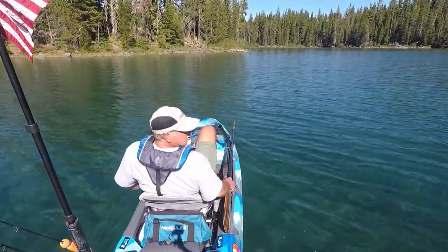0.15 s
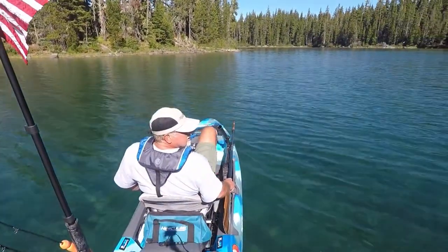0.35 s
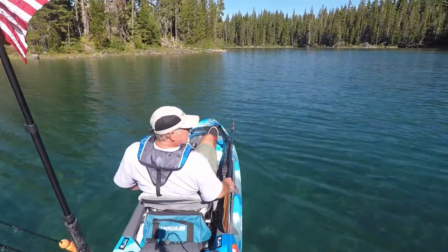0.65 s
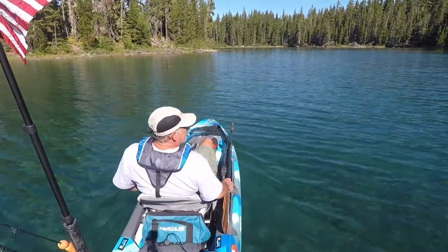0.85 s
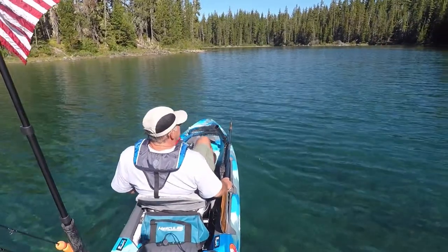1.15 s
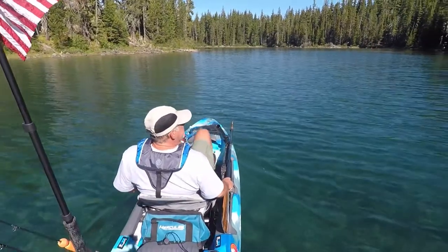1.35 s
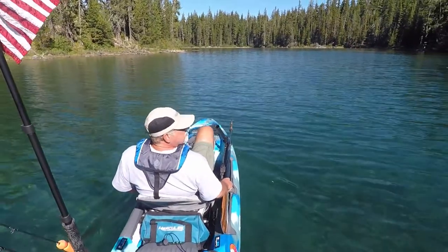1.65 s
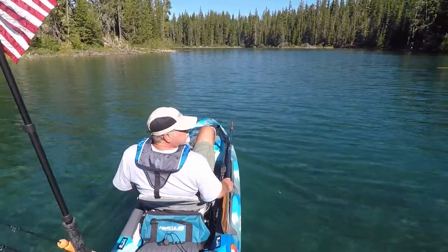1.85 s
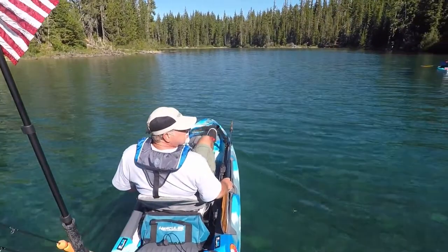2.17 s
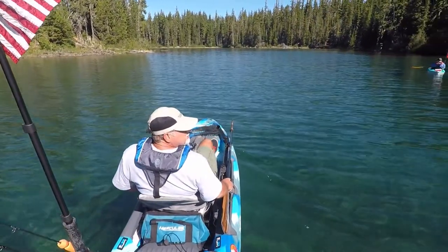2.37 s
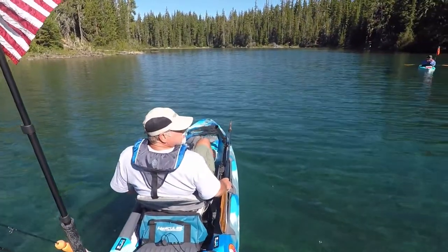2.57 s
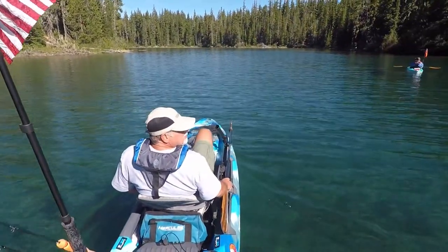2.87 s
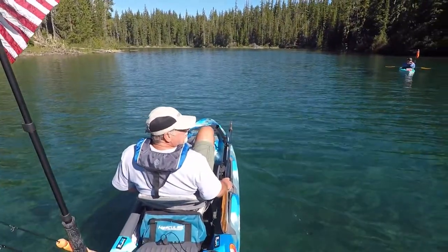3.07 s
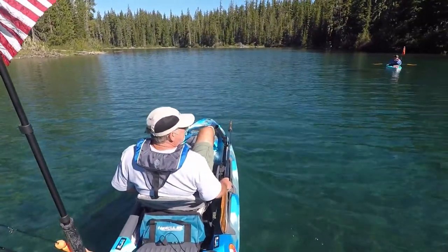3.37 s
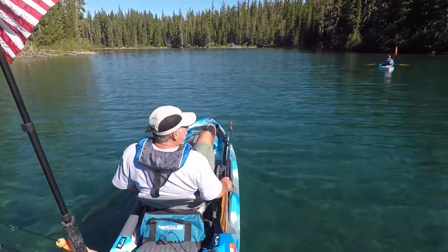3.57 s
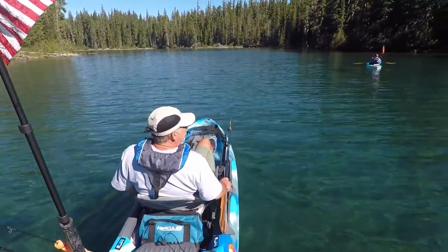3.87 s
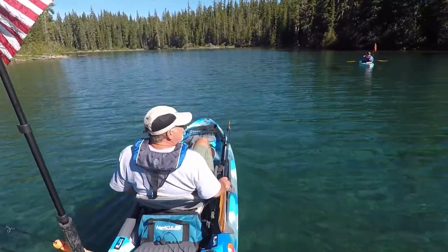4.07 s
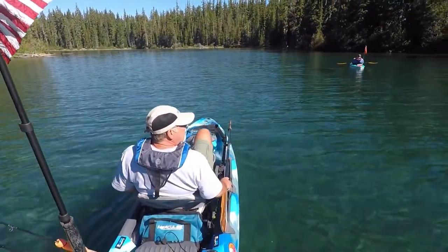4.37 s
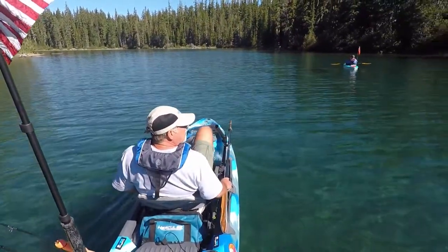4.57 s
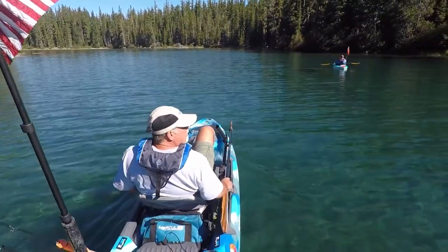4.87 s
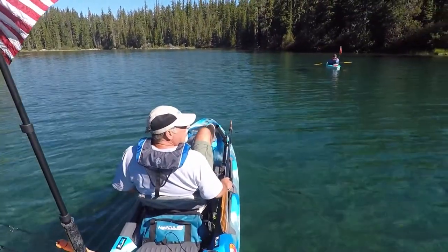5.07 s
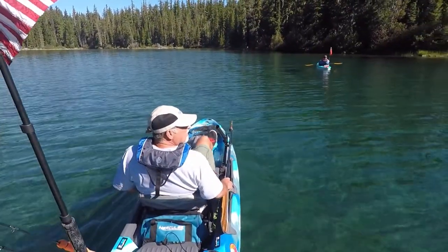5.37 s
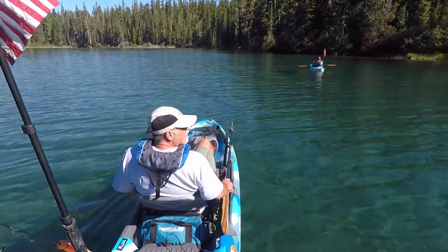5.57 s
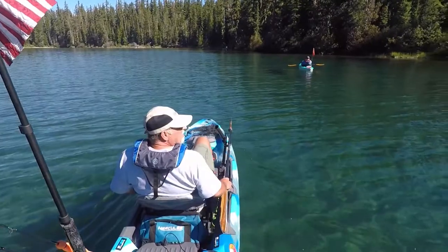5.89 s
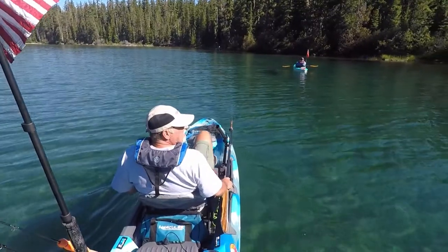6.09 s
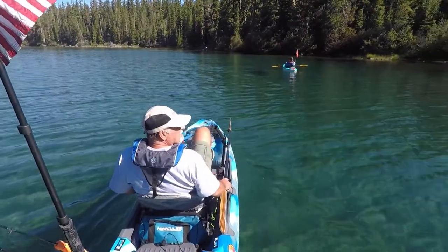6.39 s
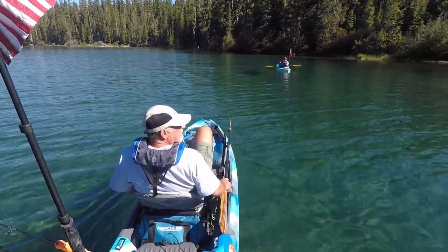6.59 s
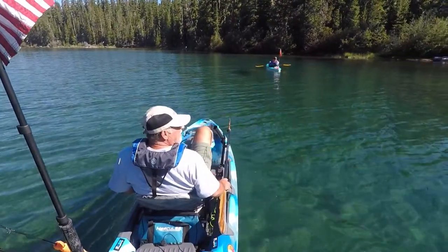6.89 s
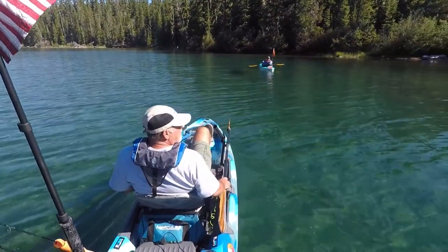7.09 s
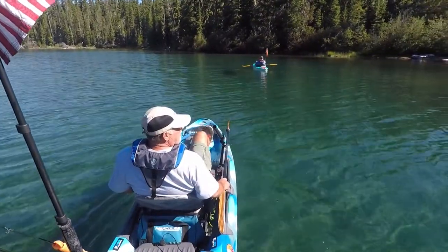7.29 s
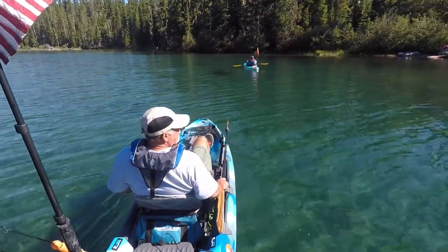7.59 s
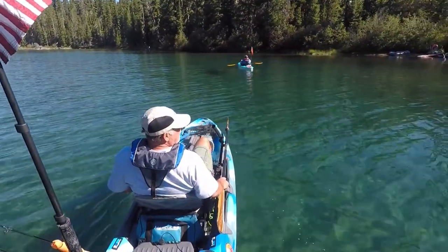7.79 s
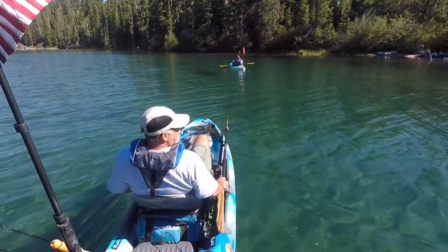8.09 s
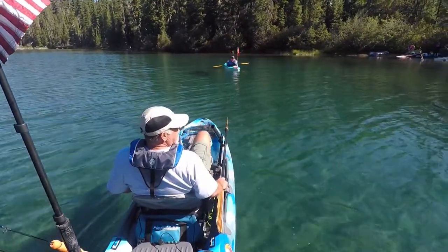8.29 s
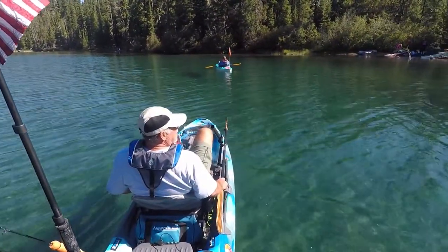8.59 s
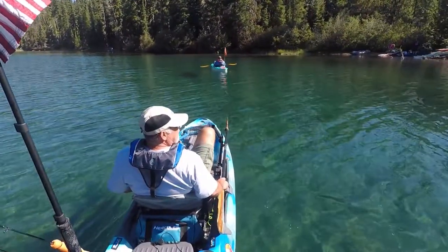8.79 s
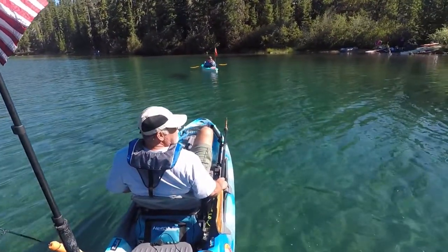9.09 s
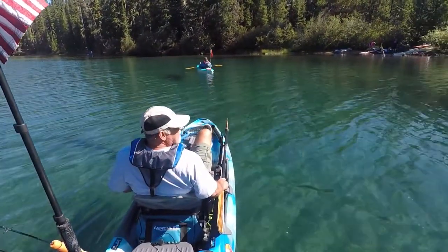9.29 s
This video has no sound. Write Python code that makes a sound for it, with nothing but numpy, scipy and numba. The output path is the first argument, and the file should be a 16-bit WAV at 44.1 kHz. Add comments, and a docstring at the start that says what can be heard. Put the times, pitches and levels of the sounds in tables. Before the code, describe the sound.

Water laps and gurgles against a moving kayak, its wake fizzing, while low wind rumble pulses on the microphone.

```python
"""On a calm lake, a pedal kayak glides along with microphones on a pole behind the seat.
Wind and pedal strokes force the modes of pole and hull, a taut line hums, and wavelets slap the plastic,
ringing pockets of trapped air. The wake hisses and fizzes with bubbles, each a small damped oscillator.
After six seconds one microphone fades into a stereo pair, which hears the shaking much louder."""
import sys
import numpy as np
from scipy import signal
from scipy.fft import rfft, irfft, next_fast_len
from scipy.io import wavfile
from scipy.ndimage import uniform_filter1d, minimum_filter1d
from numba import njit

SR = 44100
rng = np.random.default_rng(int(sys.argv[2]) if len(sys.argv) > 2 else 0)


def wav_out(sig):
    """Save sig, one row per channel (or a flat mono array), as 16-bit PCM at SR to the path in sys.argv[1]."""
    wavfile.write(sys.argv[1], SR, np.round(np.clip(np.atleast_2d(sig).T, -1, 1) * 32767).astype(np.int16))


N = 416744

# Slow course of the water: t/s, lapping level/dB, wake level/dB
WATER_LEVELS = [(0, -0.5, -1.5), (1, 0.5, -1), (2, 0, -1.5), (2.4, -4.5, -1.5), (3, 2, -1), (4, -0.5, -1),
                (4.9, 0.5, -3), (5.7, -1, -3), (6.1, 1, -4.5), (6.6, -6, -3), (7, -8, -3.5),
                (7.6, -7, -4.5), (8.1, -7, -6.5), (8.5, -7, -8), (8.8, -10, -8.5), (9.0, -7.5, -7.5),
                (9.15, -10, -8), (9.45, -7, -7.5)]
# Wake filters for the single microphone, the pair and the pair's difference signal: f/Hz, gain/dB
WAKE_SINGLE_EQ = [(471, 13), (800, 3), (1020, -0.5), (1590, -6.5), (1750, -5), (2530, -7), (3160, -10),
                  (3990, -10), (5420, -12.5), (5980, -18), (9070, -13), (15000, -33.5)]
WAKE_PAIR_EQ = [(760, -13), (1300, -3.5), (1560, -3.5), (2720, -8), (3270, -8), (4440, -15), (6750, -12),
                (8990, -14), (12300, -24), (15000, -48)]
WAKE_SIDE_EQ = [(1500, -3), (4300, -5), (6500, 0)]
# Distinct bubbles in the wake: t/s, level/dB, f/Hz, spatter level/dB
WAKE_BUBBLES = [(0.081, -32.5, 3800, -55), (0.0997, -35, 2500, -60), (0.192, -35, 3960, -61),
                (0.2792, -50, 1730, -65), (0.409, -36, 1660, -62), (0.439, -32, 1310, -68),
                (0.5182, -39, 9400, -54), (0.549, -31.5, 4730, -53), (0.552, -37, 3400, -62),
                (0.636, -31, 1490, -68), (0.7183, -35, 2420, -59), (0.727, -40, 5600, -58),
                (0.737, -41, 6500, -51), (0.788, -53, 1700, -48), (0.8365, -34.5, 3400, -61),
                (0.9592, -34, 2900, -56), (1.009, -39, 3200, -53), (1.069, -40, 9600, -60),
                (1.1343, -35, 1840, -63), (1.1967, -37, 2170, -63), (1.269, -35, 2340, -58),
                (1.33, -49, 2540, -50), (1.3513, -34, 1330, -65), (1.447, -31, 1310, -53),
                (1.491, -32, 1820, -57), (1.5184, -38, 2270, -54), (1.5758, -32.5, 2450, -56),
                (1.6332, -49, 1310, -54), (1.8138, -30, 1850, -70), (1.8726, -33.5, 1450, -59),
                (1.905, -34, 4000, -50), (2.09, -34, 5200, -67), (2.1258, -39, 1920, -51),
                (2.163, -32, 1300, -64), (2.2512, -29.5, 1920, -51), (2.2967, -34, 2620, -52),
                (2.3431, -40, 1470, -60), (2.365, -39, 2670, -61), (2.385, -31, 4620, -61),
                (2.408, -37, 2590, -60), (2.4704, -33, 1920, -64), (2.606, -49, 3640, -47),
                (2.698, -35, 1610, -53), (2.7197, -29, 2580, -49), (2.816, -32, 1410, -53),
                (2.829, -34, 3540, -56), (2.947, -35, 1740, -68), (2.967, -29, 1790, -54),
                (3.1702, -37, 1290, -65), (3.198, -32, 3800, -65), (3.241, -33.5, 2600, -65),
                (3.3, -32.5, 1490, -65), (3.5404, -49, 1330, -68), (3.594, -38, 2000, -50),
                (3.661, -37.5, 2630, -47), (3.8856, -28.5, 1870, -55), (4.1315, -32, 1780, -67),
                (4.1849, -34.5, 2030, -58), (4.3542, -35, 1790, -64), (4.388, -31, 1310, -49),
                (4.4388, -32, 2260, -61), (4.4744, -37, 2540, -52), (4.5465, -36, 1830, -68),
                (4.5802, -42, 1320, -46.5), (4.6636, -34.5, 2500, -56), (4.6947, -36, 3560, -53),
                (4.732, -47, 1450, -54), (5.041, -44, 2520, -52), (5.0699, -36, 1760, -69),
                (5.1467, -40, 1800, -68), (5.18, -30, 1340, -56), (5.23, -42, 1800, -54),
                (5.2934, -35, 2840, -69), (5.518, -38, 4200, -52), (5.6126, -41, 1860, -50.5),
                (5.9564, -35, 1600, -62), (5.993, -33, 2370, -54), (6.2765, -36, 1780, -59),
                (6.326, -31, 2550, -61), (6.6119, -48, 1740, -55), (6.6413, -33, 1710, -61),
                (6.795, -37, 2200, -67), (6.941, -37, 8300, -58), (6.9681, -34, 1680, -64),
                (6.9995, -27.5, 2880, -66), (7.0219, -38, 3520, -70), (7.1386, -38.5, 2800, -67),
                (7.195, -59, 1330, -50), (7.237, -38, 1800, -67), (7.2599, -43, 2550, -71),
                (7.3103, -30.5, 2660, -63), (7.311, -31.5, 1750, -66), (7.3673, -34.5, 3260, -53),
                (7.372, -35, 2880, -56), (7.4924, -39, 2160, -62), (7.5093, -37, 1900, -69),
                (7.5597, -48, 1410, -70), (7.662, -36, 2900, -55), (7.6964, -35, 2140, -66),
                (7.7303, -34, 1740, -60), (7.83, -37.5, 6500, -63), (7.944, -37, 1390, -60),
                (8.435, -36, 2900, -65), (8.668, -37, 1200, -70), (8.9311, -48, 1650, -64),
                (8.948, -32, 2560, -51), (9.058, -42, 2860, -60), (9.151, -44, 2250, -67),
                (9.24, -38, 1930, -73), (9.348, -44, 3200, -60)]
# A taut line singing in the gusts: t/s, f/Hz, level/dB
LINE_HUM = [(5.9, 120, -50), (6.1, 118, -36), (6.4, 112, -44), (6.72, 118, -38), (6.9, 115, -28),
            (7.15, 111, -28), (7.33, 107, -42), (7.82, 112, -46), (7.97, 117, -27), (8.2, 120, -28),
            (8.45, 117, -28), (8.72, 108, -29), (8.85, 106, -44), (9.45, 110, -44)]
# Its harmonics: harmonic number, left gain/dB, right gain/dB
LINE_HARMONICS = [(1, 1, 11), (2, -12, 6)]
# Wavelets trapping air against the hull: t/s, level/dB, pocket f/Hz
WAVELETS = [(0.406, -12.5, 855), (0.582, -5.5, 330), (0.98, -3.5, 486), (1.33, -15, 800), (1.995, 1, 567),
            (2.242, -8.5, 457), (2.255, -12.5, 1075), (2.317, -10, 725), (2.806, -4, 296),
            (2.965, -20, 1110), (3.175, -13, 670), (3.384, 2.5, 336), (3.45, -5, 622), (3.813, 1, 466),
            (3.821, 7.5, 593), (3.948, -7, 667), (4.234, -8, 298), (4.511, -15, 586), (4.567, -9, 642),
            (4.687, -10, 814), (4.833, -4.5, 446), (5.006, -10, 634), (5.18, -15, 1040), (5.334, -5.5, 471),
            (5.4, -4, 553), (5.479, -5, 310), (5.533, 1, 580), (5.737, -5, 918), (6.138, -3.5, 344),
            (6.377, -9, 624), (6.531, -15, 448), (6.649, -8, 428), (6.656, -10, 190), (6.66, -13.5, 252),
            (6.761, -11.5, 473), (6.815, -13.5, 420), (6.888, -12.5, 830), (6.93, -5.5, 445),
            (7.001, -12.5, 765), (7.144, -17, 430), (7.184, -7.5, 436), (7.213, -17, 644),
            (7.444, -8.5, 614), (7.538, -15, 374), (7.55, -14, 192), (7.609, -20.5, 438), (7.735, -10, 186),
            (7.742, -11.5, 454), (7.799, -12, 825), (7.843, -7.5, 696), (7.865, -6, 294), (7.88, -11, 860),
            (7.948, -15, 935), (8.014, -17.5, 397), (8.041, -15, 420), (8.076, -6.5, 396), (8.1, 0, 383),
            (8.121, -5, 790), (8.202, -14, 448), (8.325, -17, 726), (8.341, -11, 327), (8.35, -9, 212),
            (8.413, -7.5, 830), (8.46, -4, 750), (8.494, -10, 920), (8.522, -4.5, 408), (8.693, -10, 449),
            (8.782, -13.5, 413), (8.854, -13.5, 860), (8.857, -12, 337), (8.985, -0.5, 439),
            (8.99, -9, 274), (9.004, -3.5, 502), (9.235, -16, 710), (9.274, -6, 330), (9.309, -10.5, 347),
            (9.331, -13.5, 460)]
# Pedal strokes, later also gusts: peak t/s, pole sway level/dB, hull shudder level/dB
PUSHES = [(-0.05, 11, 8.5), (0.56, 6.5, 7.5), (1.36, 3.5, 8.5), (2.06, -2.5, 5.5), (2.86, 5.5, 9),
          (3.63, 3, 9.5), (4.4, 1, 4), (5.15, 3, -2.5), (6.0, 0, -2), (6.4, 6, 3), (7.0, 4, -5),
          (7.6, -3, -2), (8.1, 4.5, -5), (8.4, 5.5, -0.5), (9.25, 6, -17)]
# Modes of pole and hull: f/Hz, bandwidth per filter stage/Hz, single, left and right microphone gain/dB
MODES = [(22.8, 18, -20.5, -43, -21), (38.6, 13.8, -2, 5, 13.5), (63.4, 35.5, -17, -3, 6),
         (81.5, 27.3, -7.5, 0, 12), (83.7, 8.8, -16.5, -2.5, 15), (108.3, 28.7, -16.5, 3, -4),
         (165, 51, -15.5, -6.5, -5.5), (190.7, 41, -28.5, -17.5, -5), (228.4, 44.6, -9, -6, 5),
         (289, 145, -22.5, -6, -2.5), (329.3, 30, -17, 5.5, -9.5), (361.6, 43, -18.5, 2, -16),
         (410, 121, -26.5, 2.5, -3.5), (431.3, 28.5, -25.5, 3, 0.5), (484, 62, -21, -4, -2.5),
         (586.4, 270, -26, -15.5, -39), (673, 130, -27.5, -4.5, -4), (843, 239, -50, -12.5, -22.5),
         (986, 257, -34.5, -20, -18), (1320, 960, -43.5, -50, -62)]


def undb(db):
    return 10 ** (np.asarray(db) / 20)


def at_rms(x, db):
    return x * undb(db) / np.sqrt(np.mean(x ** 2))


def noise():
    return rng.standard_normal(N)


def resonate(x, hz, width_hz):
    """Resonance: two equal stages in cascade give steep skirts and unit gain at the centre."""
    b, a = signal.iirpeak(hz, hz / width_hz, fs=SR)
    return signal.sosfilt([[*b, *a]] * 2, x)


def colour(x, points):
    """Spectral shaping: the gain follows (f/Hz, gain/dB) points over log frequency."""
    hz, db = np.transpose(points)
    size = next_fast_len(N)
    f = np.arange(size // 2 + 1) * SR / size + 1
    return irfft(rfft(x, size) * undb(np.interp(np.log(f), np.log(hz), db)), size)[:N]


def flicker(rate_hz):
    """Random modulation: smoothed steps with unit standard deviation."""
    hold = int(SR / rate_hz)
    steps = np.repeat(rng.standard_normal(N // hold + 1), hold)
    smooth = uniform_filter1d(uniform_filter1d(steps, hold), hold)[:N]
    return smooth / smooth.std()


@njit
def ring_bubbles(onset_s, amplitude, hz, t60, glide):
    """Damped oscillation: each sine swells, dies in t60 seconds and rises by the fraction glide."""
    out = np.zeros(N)
    for k in range(len(onset_s)):
        start, steps = int(onset_s[k] * SR), int(t60[k] * SR) + 2
        phasor = amplitude[k] + 0j
        pole = np.exp(2j * np.pi * hz[k] / SR - np.log(1000) / steps)
        rise = np.exp(2j * np.pi * hz[k] / SR * glide / steps)
        for j in range(start, min(start + steps, N)):
            phasor *= pole
            pole *= rise
            out[j] += phasor.imag * min(1., 12. * (j - start) / steps)
    return out


def fizz(count, lo_hz, hi_hz, cycles, spread, density):
    """A random point process: bubbles burst at a rate proportional to density, a few of them loudly."""
    when, pitch, size, life = rng.random((count, 4)).T
    cumulative = np.cumsum(density)
    onset_s = np.interp(when, cumulative / cumulative[-1], np.arange(N) / SR)
    hz = lo_hz * (hi_hz / lo_hz) ** pitch
    amplitude = hz * undb(-spread * np.log(size + 0.027))
    return ring_bubbles(onset_s, amplitude, hz, t60=cycles * (.5 + life) / hz, glide=.2)


def high_hiss():
    """Band-limited noise: a faint hiss near 12 kHz, in antiphase between left and right."""
    hiss = colour(noise(), [(11500, -66), (12200, -6), (13500, -14), (15000, -21)])
    return at_rms(hiss, -77.5) * np.array([[1], [-1]])


def wake(wake_db):
    """Incoherent addition: bands of hiss, bubbles, crackle and spray sum and surge together."""
    surge = np.clip(flicker(26), -2, 1.8)
    clumps = undb(6.5 * surge)
    bands_hz = 700 * 2 ** np.arange(0, 4.6, .5)
    hiss = sum(undb(.5 * surge + 1.2 * flicker(14)) * resonate(noise(), hz, hz / 2) for hz in bands_hz)
    bubbles = fizz(3600, 700, 4500, cycles=48, spread=2.8, density=clumps)
    crackle = fizz(1500, 2500, 11000, cycles=6, spread=3.6, density=clumps)
    spray = fizz(1800, 3200, 10500, cycles=40, spread=2.8, density=undb(7 * surge + 3 * flicker(40)))
    drops = at_rms(bubbles, -5) + at_rms(crackle, -20) + at_rms(spray, -10)
    return undb(.55 * wake_db) * at_rms(hiss, 0) + undb(wake_db) * drops  # the hiss swells less


def wake_at_microphones(wake_db):
    """Partial coherence: the pair shares most of the wake, and differs more in the high treble."""
    near, beside = wake(wake_db), wake(wake_db)
    single = at_rms(colour(near, WAKE_SINGLE_EQ), -48)
    mid = at_rms(colour(near, WAKE_PAIR_EQ), -54)
    side = at_rms(colour(colour(beside, WAKE_PAIR_EQ), WAKE_SIDE_EQ), -56)
    return single, np.array([mid + side, mid - side])


def plops():
    """Bubble resonance: each distinct bubble rings amid a bright spatter and five quieter companions."""
    onset_s, db, hz, spatter_db = np.array(WAKE_BUBBLES, float).T
    t60 = np.minimum(60 / hz, 0.016)  # small bubbles die sooner
    spatter_s, cluster_s = .005, .011  # scatter of the onsets
    spatter_t60 = np.full_like(t60, 0.0065)
    out = ring_bubbles(onset_s, undb(db), hz, t60, glide=.02)
    draws = rng.random((len(hz), 6, 3)).transpose(1, 2, 0)
    for band_hz, (late, pitch, size) in zip((3300, 4200, 5400, 6800, 8300, 10000), draws):
        amplitude = undb(spatter_db + 13 - 10 * size)
        spatter_hz = band_hz * (.88 + .24 * pitch)
        out += ring_bubbles(onset_s + spatter_s * late ** 2, amplitude, spatter_hz, spatter_t60, glide=0.)
    for late, pitch, size in rng.random((len(hz), 5, 3)).transpose(1, 2, 0):
        amplitude = undb(db - 6 - 4.8 * size)
        cluster_hz = np.minimum(hz * (.7 + .7 * pitch), 12000.)
        out += ring_bubbles(onset_s + cluster_s * (late - .3), amplitude, cluster_hz, .7 * t60, glide=.03)
    return out


def line_hum(t):
    """Wind-driven vibration: a taut line's wavering tone and octave reach the pair in antiphase."""
    times, hz, db = np.transpose(LINE_HUM)
    wavering_hz = np.interp(t, times, hz) * (1 + .011 * flicker(14))
    phase = 2 * np.pi * np.cumsum(wavering_hz) / SR
    tone = np.zeros((2, N))
    for harmonic, left_db, right_db in LINE_HARMONICS:
        gains = np.array([[-undb(left_db)], [undb(right_db)]])
        tone += gains * undb(2.8 * flicker(14)) * np.sin(harmonic * phase)
    return tone * undb(np.interp(t, times, db))


def wavelet_slaps():
    """Impact and cavity resonance: a wavelet knocks the hull and the air it traps rings briefly."""
    ring_s, swell_s, chop_from_s = 0.023, 0.001, 6.2
    glug_db, slap_db = (-28, -13, -9), (-21.5, -5, 2.5)  # overtone, slosh, knock
    force, airborne = np.zeros((2, N + SR))
    rub = at_rms(signal.lfilter([1, -.93], [1, -.85], rng.standard_normal(N + SR)), -1)  # on the plastic
    slosh_band = signal.butter(2, [180, 1000], "band", fs=SR, output="sos")
    slosh = at_rms(signal.sosfilt(slosh_band, rng.standard_normal(N + SR)), 0)
    knock = np.hanning(int(0.0026 * SR))
    t = np.arange(int(3 * ring_s * SR)) / SR
    envelope = (1 - np.exp(-t / swell_s)) * np.exp(-2 * t / ring_s)
    for onset_s, db, hz in WAVELETS:
        overtone_db, slosh_db, knock_db = slap_db if onset_s > chop_from_s else glug_db
        start = int(onset_s * SR)
        span = slice(start, start + len(t))
        pocket = np.sin(2 * np.pi * hz * t)
        overtone = undb(overtone_db) * np.sin(2 * np.pi * 1.85 * hz * t)
        airborne[span] += undb(db) * envelope * pocket
        force[span] += undb(db) * envelope * (pocket + overtone + rub[span] + undb(slosh_db) * slosh[span])
        force[start:start + len(knock)] += undb(db + knock_db) * knock
    return force[:N], airborne[:N]


def strokes_and_gusts(t):
    """Addition of powers: Gaussian pushes rise over a steady floor; the pole sways ahead of the hull."""
    half_width_s, sway_lead_s = 0.15, 0.16
    peak_s, sway_db, shudder_db = np.transpose(PUSHES)[:, :, None]

    def drive_db(centre_s, db, floor_db):
        powers = undb(2 * db) * np.exp(-((t - centre_s) / half_width_s) ** 2)
        return 10 * np.log10(undb(2 * floor_db) + powers.sum(axis=0))

    return drive_db(peak_s - sway_lead_s, sway_db, floor_db=1.5), drive_db(peak_s, shudder_db, floor_db=-3)


def pole_and_hull(sway_db, shudder_db, lap_db):
    """Forced vibration: pushes and water drive the modes, which shake the pair in opposite phase."""
    lapping = flicker(20)  # small gurgles under the hull come and go together
    gurgle = fizz(900, 150, 1300, cycles=9, spread=2.4, density=undb(4 * lapping))
    slap_force, airborne = wavelet_slaps()
    blows = slap_force + undb(lap_db) * at_rms(gurgle, -19)
    single, pair = undb(-23) * airborne, np.zeros((2, N))
    for k, (hz, width_hz, single_db, left_db, right_db) in enumerate(MODES):
        if k < 8:  # pushes drive the low modes, lapping the rest
            drive = undb(sway_db if k < 3 else shudder_db)
        else:
            drive = undb(lap_db - 7.5 + 1.8 * lapping + 1.5 * flicker(12))
        coherence = np.clip(0.45 + hz / 600, 0, 1)  # wind on the pair is partly unrelated in the bass
        shared = resonate(drive * noise() + (-1) ** k * blows, hz, width_hz)
        unrelated = resonate(drive * noise(), hz, width_hz) if coherence < 1 else 0
        left = -coherence * shared + np.sqrt(1 - coherence ** 2) * unrelated
        single += undb(single_db) * shared
        pair += np.array([undb(left_db) * left, undb(right_db) * shared])
    return single, pair


def scene():
    """Superposition: boat and water add, with a linear crossfade from one microphone to the pair."""
    t = np.arange(N) / SR
    times, *levels = np.transpose(WATER_LEVELS)
    lap_db, wake_db = (np.interp(t, times, db) for db in levels)
    sway_db, shudder_db = strokes_and_gusts(t)
    hull_single, hull_pair = pole_and_hull(sway_db, shudder_db, lap_db)
    wake_single, wake_pair = wake_at_microphones(wake_db)
    single = hull_single + wake_single
    pair = hull_pair + wake_pair + line_hum(t)
    fade = np.interp(t, [6, 6.674], [0, 1])
    return (1 - fade) * single + fade * pair + plops() + high_hiss()


def record(dry):
    """Split-band limiting: loud peaks turn down the low band; the deepest bass and the top are cut."""
    bottom_hz, split_hz, top_hz = 18, 1500, 15100
    knee_db, hold = -3.5, int(.03 * SR)
    x = signal.sosfilt(signal.butter(2, bottom_hz, "high", fs=SR, output="sos"), dry)
    treble = signal.sosfiltfilt(signal.butter(2, split_hz, "high", fs=SR, output="sos"), x)
    peak = np.abs(x).max(axis=0) + 1e-9
    gain = np.minimum(1, undb(knee_db) / peak) ** .8
    gain = uniform_filter1d(minimum_filter1d(gain, size=hold), size=hold)
    limited = gain * (x - treble) + treble
    return signal.sosfilt(signal.ellip(10, .2, 80, top_hz, fs=SR, output="sos"), limited)


dry = scene()
out = record(dry)
wav_out(out)
```